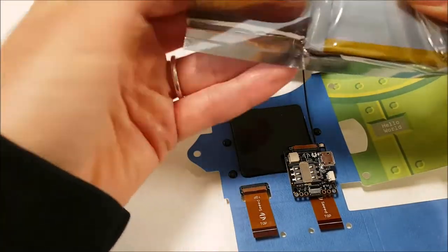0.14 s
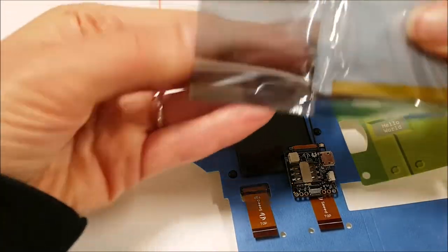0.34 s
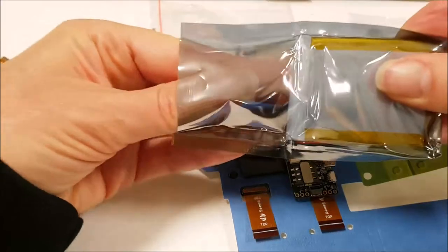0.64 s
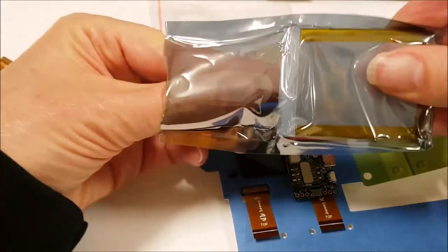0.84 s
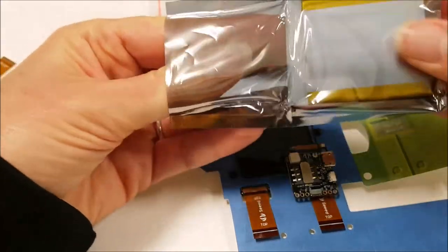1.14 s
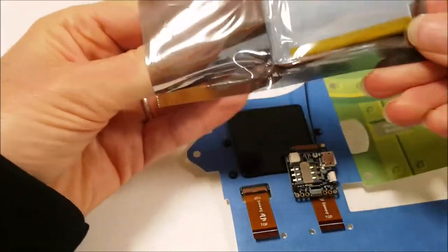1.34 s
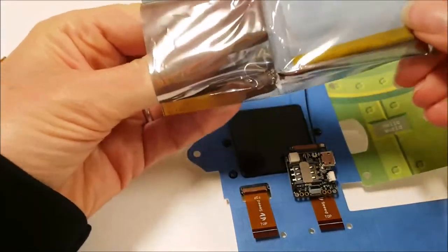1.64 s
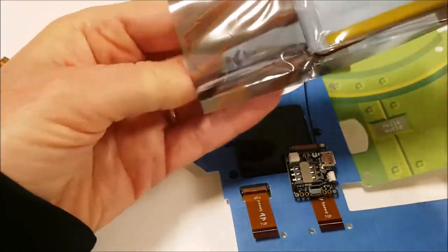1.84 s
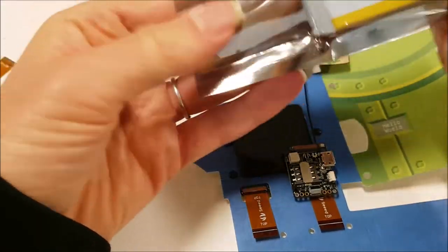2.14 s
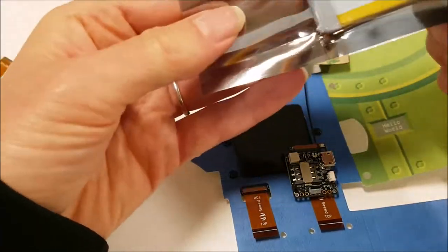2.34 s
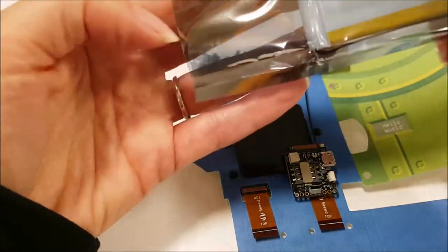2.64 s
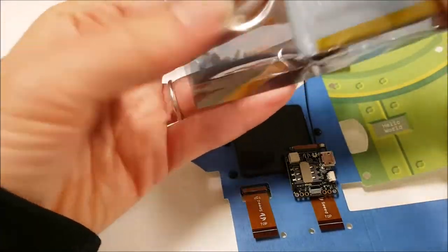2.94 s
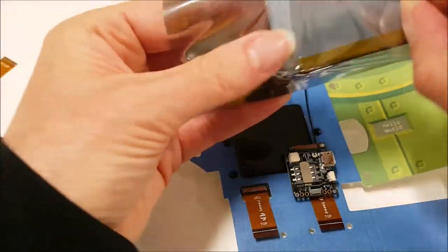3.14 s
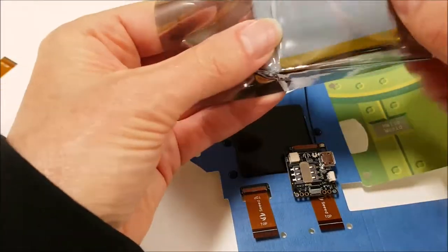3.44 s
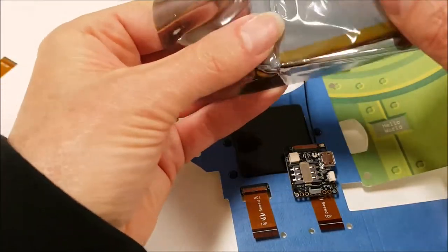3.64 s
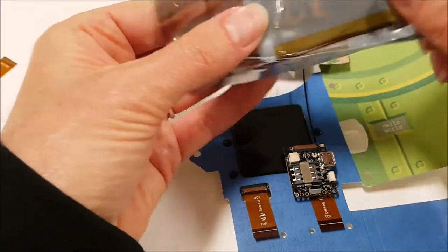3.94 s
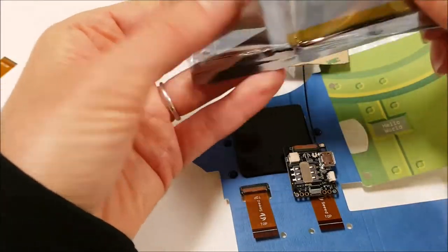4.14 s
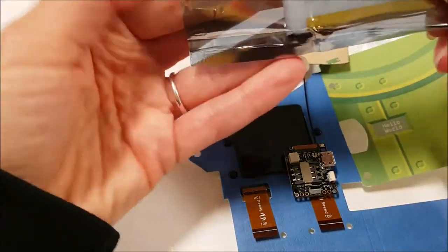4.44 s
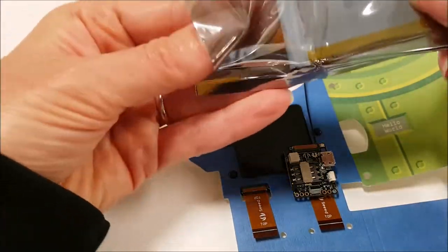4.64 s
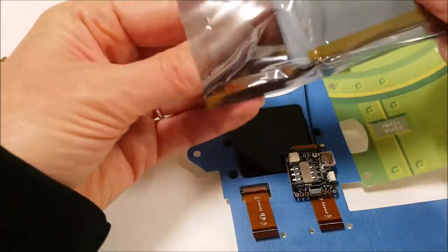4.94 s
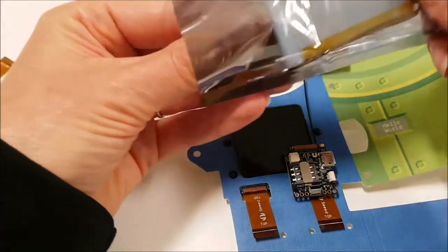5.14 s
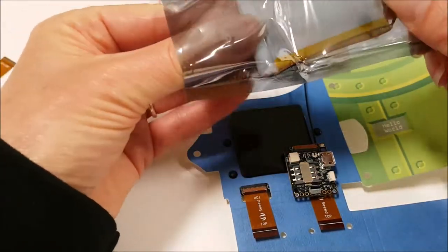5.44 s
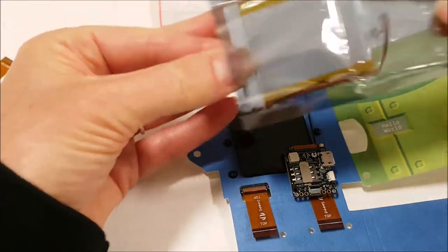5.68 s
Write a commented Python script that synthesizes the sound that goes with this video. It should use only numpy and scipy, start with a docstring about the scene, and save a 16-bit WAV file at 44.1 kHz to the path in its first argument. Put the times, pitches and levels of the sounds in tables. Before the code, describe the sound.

Stiff metallized plastic pouch crinkles and crackles sharply in someone's hands, close up, with irregular snaps and small hollow pops in a quiet room.

```python
"""Crackling of a stiff metallized pouch

Hands squeeze and work open a stiff metallized plastic pouch, close to a phone above a table in a small room.
Creases buckle one by one: filtered jolts make each ridge crack and ring and the panel around it pop.
Some yield just before the snap and smaller neighbours follow; faint stray creases tick in between.
Sliding film rubs, prickles and hisses as shaped noise; soft damped sines are the bumps of the hands.
Table and wall echoes answer, over room air and faint hums."""
import sys
import numpy as np
from scipy import signal
from scipy.fft import rfft, irfft, next_fast_len
from scipy.io import wavfile
from scipy.ndimage import uniform_filter1d

SR = 44100
rng = np.random.default_rng(int(sys.argv[2]) if len(sys.argv) > 2 else 0)


def transcribe(u):
    """Save the signal u as a 16-bit wav file named by the first command-line argument.

    u: samples, shape (n,) or (channels, n), limited to [-1, 1]; the rate is SR.
    q: integer samples, one column per channel.
    """
    v = np.clip(np.atleast_2d(u).T, -1, 1)
    q = np.round(v * 32767).astype(np.int16)
    wavfile.write(sys.argv[1], SR, q)


N = 256220
TIME = np.arange(N) / SR
AGE = np.arange(2048) / SR  # time axis of one short sound, s
TOP_HZ = 16300

# creases that buckle: snap_s, strength_db, sharpness_db (crack over ring), slackness_db (pop over ring),
# panel_pitch_hz
CREASES = [(0.0174, -25.5, -17, -4.5, 730), (0.0844, -32, -26, -9, 680), (.113, -24.5, -18, -7, 464),
           (0.1256, -18, -17.5, -22, 920), (0.1459, -17.5, -36, -7.5, 800), (.1509, -30.5, -6, -13, 880),
           (0.318, -34, -20, -8, 780), (0.3467, -42, -20, 14, 655), (0.3655, -40.5, -17, 6, 490),
           (0.4331, -25, -37, 3.5, 514), (.495, -31, -14.5, -29, 620), (0.5076, -29, -10, -7, 744),
           (.599, -28.5, -7.5, -4.5, 1000), (.6352, -38.5, -6.5, -2.5, 676), (0.6845, -53, -4, 13.5, 805),
           (.7265, -37, -11, -13, 590), (0.7426, -20.5, -12.5, -7.5, 564),
           (0.8824, -20.5, -10.5, -13.5, 635), (0.9955, -40.5, -25, 10.5, 910), (1.002, -21, -10, -18, 730),
           (1.0413, -28, -24, -2.5, 780), (1.0856, -35.5, -13, -3, 560), (1.0968, -17.5, -14, -8.5, 570),
           (1.241, -43.5, -2.5, 7.5, 490), (1.3572, -37, -81, 5, 810), (1.424, -50, -34, 14, 544),
           (1.5091, -57, -26, 12, 756), (1.557, -62, -14, 22, 770), (1.5761, -32, -19, -3, 500),
           (1.7162, -48, -19, 10, 527), (1.9357, -44, -43, -15, 360), (1.9773, -30, -12.5, -2.5, 328),
           (2.014, -43.5, -8, 7, 620), (2.0544, -41, -47, 1, 527), (2.0832, -50.5, -31, 11.5, 665),
           (2.1311, -40, -26, -4, 865), (2.212, -35, -17, 0, 573), (2.2364, -47, -24, 7.5, 640),
           (2.2998, -36.5, -58, 1.5, 540), (2.422, -51, -29, 7.5, 745), (2.4617, -26, -68, -7.5, 593),
           (2.47, -20.5, -15, -16, 730), (2.498, -30.5, -43, -5.5, 980), (2.5157, -38, -32, 1, 630),
           (2.594, -32.5, -46, -4, 670), (2.6276, -25.5, -18, -11.5, 640), (2.68, -57, -17, 20, 635),
           (2.8593, -28, -5.5, -9.5, 790), (2.8716, -37.5, -18, -4, 610), (2.99, -24, -13, -6.5, 726),
           (3.041, -39.5, -6.5, -0.5, 392), (3.1057, -38.5, 2, -29, 730), (3.1142, -35.5, -2, -38, 510),
           (3.1604, -24.5, -4, -21, 890), (3.2396, -45, -24, 12, 650), (3.2553, -23, -10, -6, 477),
           (3.3309, -24.5, -12, -6.5, 1090), (3.3415, -30, -9, -6.5, 1060), (3.3758, -41, -18, 0, 477),
           (3.4143, -43, -29, -1, 680), (3.4869, -39, -6, 1.5, 850), (3.5343, -37, -4, -4.5, 790),
           (3.6562, -38.5, -15, 1, 796), (3.7036, -25, -9, -14.5, 470), (3.7587, -21.5, -14.5, -7.5, 455),
           (3.8103, -34, -21, 3, 796), (3.9231, -43.5, -8.5, 14.5, 705), (3.99, -30.5, -11.5, -1.5, 573),
           (4.167, -31, -17.5, 3.5, 506), (4.1773, -34.5, -16, -12, 656), (4.2719, -39, -14, -3.5, 860),
           (4.3872, -43.5, -25, -7.5, 560), (4.4177, -31.5, -23, -0.5, 654), (4.578, -20.5, -12.5, -7, 760),
           (4.7617, -26, -18, -15.5, 560), (4.791, -40.5, -24, 7, 510), (4.8146, -21, -18, -25, 784),
           (4.88, -35.5, -19, 2.5, 716), (4.9311, -40.5, -17, -11, 500), (4.967, -31, -11, 3, 890),
           (5.0923, -38.5, -1.5, -12, 510), (5.1465, -44.5, -22, 13, 610), (5.1515, -29, -4, -14.5, 644),
           (5.1616, -36, -25, -14, 720), (5.1867, -30, -47, 0, 850), (5.2055, -26.5, -17.5, -4, 760),
           (5.3177, -13.5, -18, -19.5, 623), (5.3734, -33.5, -31, -4, 745),
           (5.3932, -29.5, -10.5, -10, 690), (5.4209, -25.5, -19.5, -5.5, 790),
           (5.5863, -49.5, -25, 12, 550), (5.6566, -38, -11, 3, 660), (5.7118, -39.5, -24, 5, 700),
           (5.7214, -26, -15, -6.5, 660)]

# a harder snap and a sharper tip ring higher
RING_HZ = 4670
USUAL_DB, USUAL_SHARPNESS_DB = -30, -17
OCTAVES_PER_STRENGTH_DB, OCTAVES_PER_SHARPNESS_DB = .005, .008
# flex of the film between ridge and panel: offset from strength, share of slackness added
FLEX_DB, FLEX_SLACK_SHARE = -2.5, .52


def undb(db):
    """Decibels to gain."""
    return 10 ** (np.asarray(db) / 20)


def level(x, db):
    """Set the rms level."""
    return x * undb(db) / np.sqrt(np.mean(x ** 2))


def burst(x, db):
    """Give a short sound the energy of one millisecond at this level."""
    return x * undb(db) * np.sqrt(SR / 1000 / np.sum(x ** 2))


def colour(x, points):
    """Filter by a (freq_hz, gain_db) outline, minimum-phase so that attacks stay sharp."""
    size = next_fast_len(len(x) + 2048)
    hz, db = np.transpose(points)
    log_hz = np.log(np.fft.rfftfreq(size, 1 / SR) + 1)
    log_gain = np.log(undb(np.interp(log_hz, np.log(hz), db)))
    # folding the cepstrum makes the filter causal
    cepstrum = irfft(log_gain, size)
    cepstrum[1:size // 2] *= 2
    cepstrum[size // 2:] = 0
    response = np.exp(rfft(cepstrum))
    return irfft(rfft(x, size) * response, size)[:len(x)]


def band(x, low_hz, high_hz, order):
    """Band-pass filter."""
    edges_hz = [low_hz, min(high_hz, SR / 2 - 500)]
    return signal.lfilter(*signal.butter(order, edges_hz, "band", fs=SR), x)


def resonate(x, hz, q):
    """One damped resonance."""
    return signal.lfilter(*signal.iirpeak(hz, max(q, .5), fs=SR), x)


def fading_noise(t, t60_s):
    """Noise that dies away by 60 dB in t60_s."""
    return rng.standard_normal(len(t)) * np.exp(-np.log(1000) * t / t60_s)


def span(start_s, end_s, smooth_samples):
    """Gate that is open from start to end, with smoothed edges."""
    return uniform_filter1d(1. * ((TIME >= start_s) & (TIME < end_s)), size=smooth_samples)


def add(out, s, sound):
    """Lay a short sound into the track at its moment."""
    start = int(np.clip(s * SR, 0, N - 1))
    out[start:start + len(sound)] += sound[:N - start]


def jolt(shiver_db, t60_s):
    """A sudden push, then the shiver of bending waves scattered by the wrinkles."""
    push = burst(fading_noise(AGE, t60_s), shiver_db)
    push[0] += np.sqrt(SR / 1000)  # impulse at 0 dB on the burst scale
    return push


def crease(ring_db, ring_hz, crack_db, flex_db):
    """One ridge snaps through: the sharp tip cracks, the ridge rings, the film flexes."""
    ring = resonate(jolt(shiver_db=1.0, t60_s=0.0069), ring_hz, q=2.9)
    ring = band(ring, 2560, 5610, order=3)
    crack = resonate(jolt(shiver_db=8.5, t60_s=0.0045), 1.443 * ring_hz, q=3.44)
    crack = band(crack, 4240, 14400, order=2)
    flex = band(jolt(shiver_db=7.5, t60_s=0.02), 1125, 2800, order=2)
    return burst(ring, ring_db) + burst(crack, crack_db) + burst(flex, flex_db)


def ridge(db, sharpness_db, slackness_db, octaves):
    """A ridge whose pitch, crack and flex follow from how hard, sharp and slack it is."""
    rise_octaves = OCTAVES_PER_STRENGTH_DB * (db - USUAL_DB)
    rise_octaves += OCTAVES_PER_SHARPNESS_DB * (sharpness_db - USUAL_SHARPNESS_DB)
    ring_hz = RING_HZ * 2 ** (rise_octaves + octaves)
    flex_db = db + FLEX_DB + FLEX_SLACK_SHARE * slackness_db
    return crease(db, ring_hz, db + sharpness_db, flex_db)


def panel(x, hz):
    """The slack panel around a crease resonates low and broadly, a hollow pop."""
    return band(resonate(x, hz, q=1.77), 170, 1280, order=2)


def pop(db, hz):
    """The hollow pop of a jolted panel."""
    return burst(panel(jolt(shiver_db=7, t60_s=0.017), hz), db)


def crinkles(lead_s=0.00091):
    """The panel starts to give just before each ridge snaps."""
    out = np.zeros(N)
    for s, db, sharpness_db, slackness_db, panel_hz in CREASES:
        add(out, s - lead_s, pop(db + slackness_db, panel_hz))
        add(out, s, ridge(db, sharpness_db, slackness_db, 0))
    return out


def yielding(ahead_s=.014, scatter=0.19, tick_db=-25, pop_db=-16, tip_db=-23, chance=.4):
    """As the load builds, some creases yield with a dull tick a moment before they snap."""
    out = np.zeros(N)
    for s, db, _, slackness_db, panel_hz in CREASES:
        tick = ridge(db + tick_db, tip_db, 0, 0) + pop(db + slackness_db + pop_db, panel_hz)
        early_s = ahead_s * np.exp(scatter * rng.standard_normal())
        add(out, s - early_s, tick * (rng.random() < chance))
    return out


def neighbours(settle_s=0.019, neighbour_db=-22, scatter_db=3, fade_db_per_s=150,
               lower_octaves=0.54, pop_db=-19, count=5):
    """Each snap passes its load to smaller creases nearby, which tend to be weaker the later they let go."""
    out = np.zeros(N)
    for s, db, sharpness_db, slackness_db, panel_hz in CREASES:
        for wait, size, pitch in rng.standard_normal((count, 3)):
            wait_s = settle_s * abs(wait)
            tick = undb(neighbour_db) * ridge(db, sharpness_db, slackness_db, -lower_octaves * abs(pitch))
            tick = tick + pop(db + slackness_db + pop_db, panel_hz * 2 ** (pitch / 2))
            add(out, s + wait_s, undb(scatter_db * size - fade_db_per_s * wait_s) * tick)
    return out


def strays(db=-57, spread_db=3.0, sharpness_db=-11, sharpness_spread_db=6, slackness_db=-3, count=70):
    """The handled film is never quite still: faint creases tick at random moments."""
    out = np.zeros(N)
    for when, size, tip, pitch in rng.random((count, 4)):
        tick_db = db - spread_db * np.log(max(size, .05))  # most are small, a few stand out
        tip_db = sharpness_db + sharpness_spread_db * (2 * tip - 1)
        tick = ridge(tick_db, tip_db, slackness_db, 0)
        add(out, when * N / SR, tick + pop(tick_db + slackness_db, 500 * 2 ** pitch))
    return out


def wrinkles(count=400, size_db=6, spread_db=4.5):
    """Tiny wrinkles give way at random, each with its own tick and pop."""
    out = np.zeros(N)
    for when, size, tick_octaves, pop_octaves, pop_share in rng.random((count, 5)):
        tick = resonate(jolt(shiver_db=-5, t60_s=0.011), 2400 * 2 ** tick_octaves, q=3.0)
        tick = band(tick, 820, 4900, order=3)
        hollow = panel(jolt(shiver_db=6, t60_s=0.0056), 550 * 2 ** pop_octaves)
        db = size_db - spread_db * np.log(max(size, .05))  # most are small, a few stand out
        add(out, when * N / SR, burst(tick, db) + pop_share * burst(hollow, db + 6.0))
    return out


def sliding(slips_per_s=260, spread_db=4, prickle_db=-1, slip_decay_s=0.00018):
    """Sliding film sticks and slips finely and sheds wrinkles; where it is taut it also hisses."""
    # film on film and fingers: start_s, end_s, level_db, hiss_db (taut film, over level_db)
    slides = [(0, 0.096, -48.5, -5), (0.318, 0.537, -54, -13), (0.5, 0.749, -61.5, -5),
              (0.98, 1.1, -60.5, -3), (1.59, 1.75, -72.5, -28), (1.756, 1.91, -70, 2.5),
              (1.913, 1.997, -58.5, -36), (2.017, 2.36, -79, -16), (2.484, 2.542, -60, -16),
              (2.75, 2.793, -66, -25), (3.014, 3.266, -68.5, -7), (3.325, 3.437, -58.5, -15),
              (3.653, 3.678, -46.5, -15), (4.386, 4.427, -56.5, -5), (4.528, 4.555, -46, -1),
              (4.785, 5, -63, 3.5), (5.058, 5.27, -73, 3), (5.533, 5.828, -63.5, -3.5)]
    # tint of the rub: freq_hz, gain_db
    rub_colour = [(120, -21.5), (350, 5.5), (700, -3.5), (1100, -0.5), (2500, -1), (4800, -5),
                  (6800, -23.5), (16000, -29.5)]
    effort, taut = np.zeros(N), np.zeros(N)
    for start_s, end_s, db, hiss_db in slides:
        stroke = undb(db) * span(start_s, end_s, 600)
        effort = effort + stroke
        taut = taut + undb(hiss_db) * stroke
    slip_gain = undb(spread_db * np.minimum(rng.exponential(size=N), 4))
    slips = slip_gain * (rng.random(N) < slips_per_s / SR)
    slip_envelope = signal.lfilter([1], [1, -np.exp(-1 / (slip_decay_s * SR))], slips)
    prickle = slip_envelope * rng.standard_normal(N)
    friction = level(prickle, prickle_db) + rng.standard_normal(N)
    rub = level(colour(friction, rub_colour), -0.91)
    hiss = level(band(resonate(friction, 4000, q=2.4), 3300, 5800, order=1), 0)
    return effort * (rub + wrinkles()) + taut * hiss


def bumps(rise_s=0.0035):
    """Fingers shift their grip and nudge the whole pouch: low sines that swell and die away."""
    # soft bumps of the hands: start_s, level_db, pitch_hz
    nudges = [(0.361, -47, 200), (1.004, -44.5, 114), (1.178, -38.5, 81), (2.641, -44.5, 155),
              (5.41, -42, 157)]
    out = np.zeros(N)
    for s, db, hz in nudges:
        thud = AGE * np.exp(-AGE / rise_s) * np.sin(2 * np.pi * hz * AGE)
        add(out, s, burst(thud, db))
    return out


def room(x, table_db=-21, table_s=0.0038, wall_s=.0098, early_db=5, early_s=0.0045, grain_db=3,
         tail_db=-11.0, t60_s=0.31, treble_t60_s=0.26, count=16):
    """The table throws back a quick echo; the walls add a short tail; both change as the pouch moves."""
    # tint of the wall echoes: freq_hz, gain_db
    echo_colour = [(300, -1.5), (1200, -2), (2800, 1), (4200, -5.5), (5400, -8.5), (16000, -4.5)]
    t = TIME[:SR // 2]
    out = x
    for place in range(count):
        tail = band(fading_noise(t, t60_s), 83, 5900, order=2)
        tail = tail + band(fading_noise(t, treble_t60_s), 4600, TOP_HZ, order=2)
        # the nearest walls answer first and loudest, and echoes arrive in uneven clumps
        tail *= (t > wall_s) * undb(early_db * np.exp(-np.abs(t - wall_s) / early_s))
        tail *= undb(grain_db * np.repeat(rng.standard_normal(len(t)), 50)[:len(t)])
        echoes = colour(tail * undb(tail_db) / np.sqrt(np.sum(tail ** 2)), echo_colour)
        echoes[int(table_s * (1 + rng.random() / 2) * SR)] += undb(table_db)
        # equal-power crossfade from place to place
        distance = np.abs(np.linspace(0, count - 1, N) - place)
        nearness = np.sqrt(np.maximum(1 - distance, 0))
        out = out + signal.oaconvolve(x * nearness, echoes)[:N]
    return out


def background(air_db=-61):
    """Still room air as coloured noise, and low sine hums, each over its own span."""
    # tint of the air: freq_hz, gain_db
    air_colour = [(20, -2), (50, -0.5), (110, -7), (230, -5.5), (500, -14), (1000, -22.5), (3500, -27),
                  (5100, -23.5), (6600, -37.5), (16000, -42.5)]
    # low hums: pitch_hz, level_db, start_s, end_s
    hums = [(40.8, -70, 4, 6), (81.4, -65, 1, 1.6), (119.6, -68.5, -1.5, 6)]
    hum = np.zeros(N)
    for hz, db, start_s, end_s in hums:
        tone = np.sin(2 * np.pi * (hz * TIME + rng.random()))
        hum += level(tone, db) * span(start_s, end_s, 4000)
    return hum + level(colour(rng.standard_normal(N), air_colour), air_db)


def scene():
    """The pouch in the room, one channel."""
    snaps = yielding() + crinkles() + neighbours() + strays()
    pouch = snaps + sliding() + bumps()
    return (room(pouch) + background())[None]


def record(dry):
    """The phone hollows the middle a little and cuts the top."""
    heard = dry - 0.25 * resonate(dry, 973, q=3.6)
    top_cut = signal.ellip(8, .2, 70, TOP_HZ, fs=SR, output="sos")
    return signal.sosfilt(top_cut, heard)


dry = scene()
out = record(dry)
transcribe(out)
```